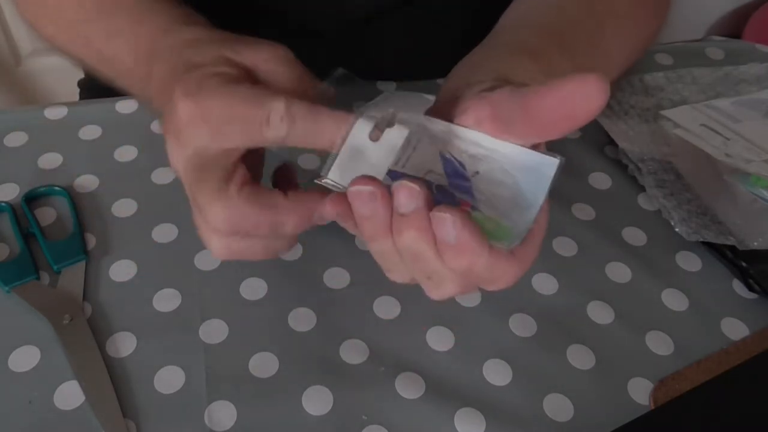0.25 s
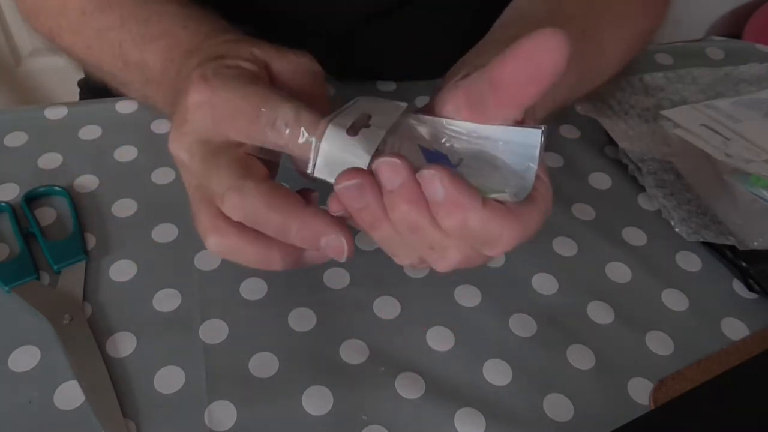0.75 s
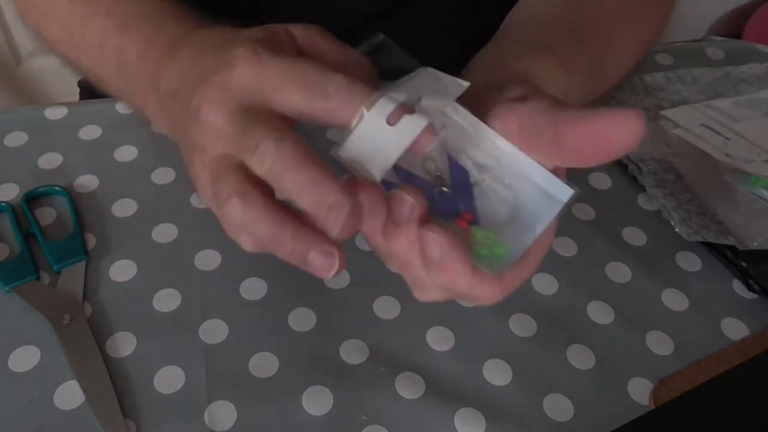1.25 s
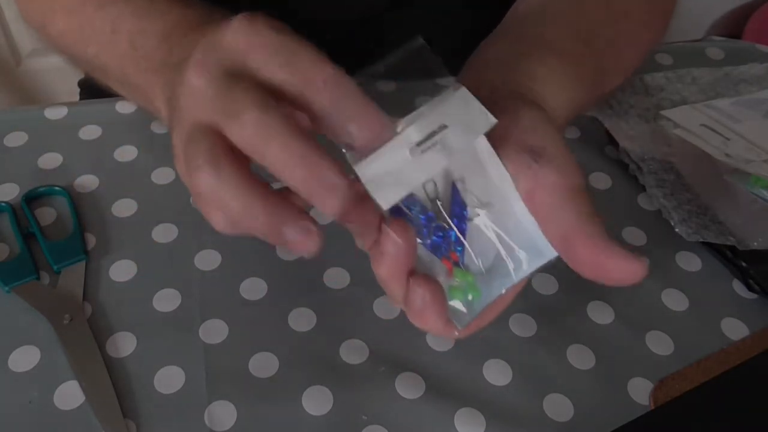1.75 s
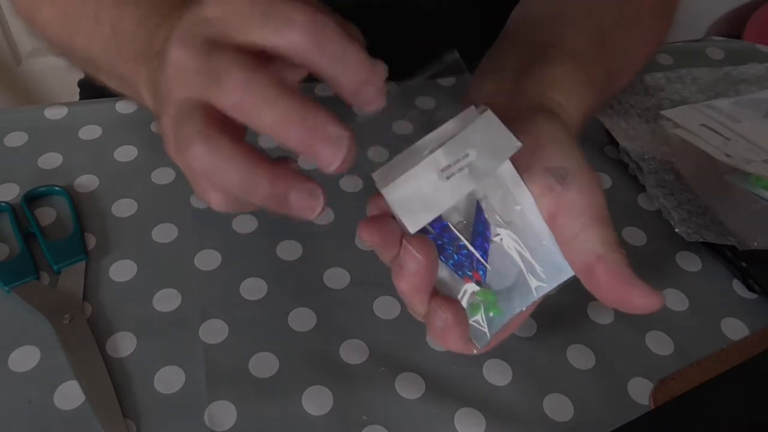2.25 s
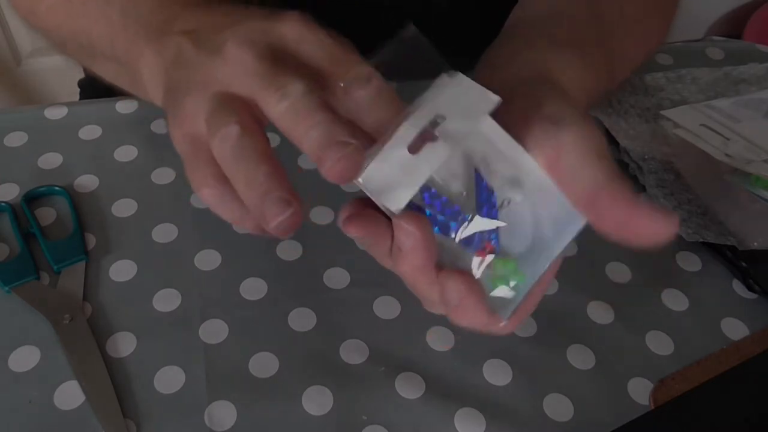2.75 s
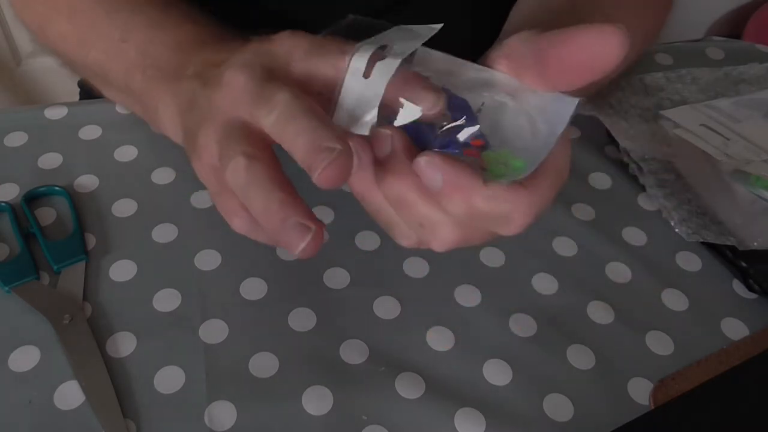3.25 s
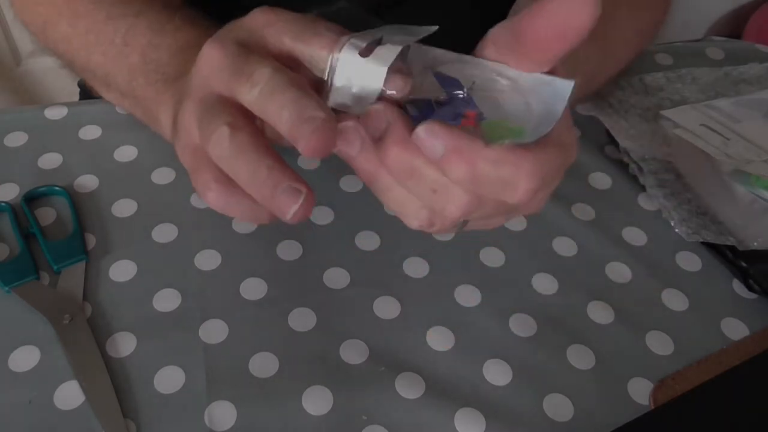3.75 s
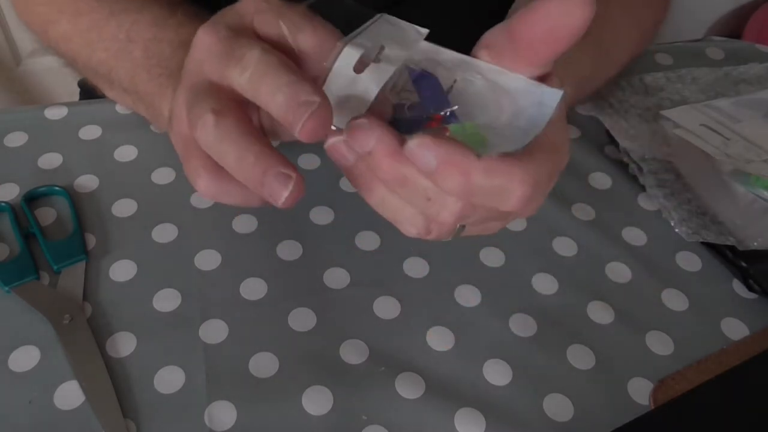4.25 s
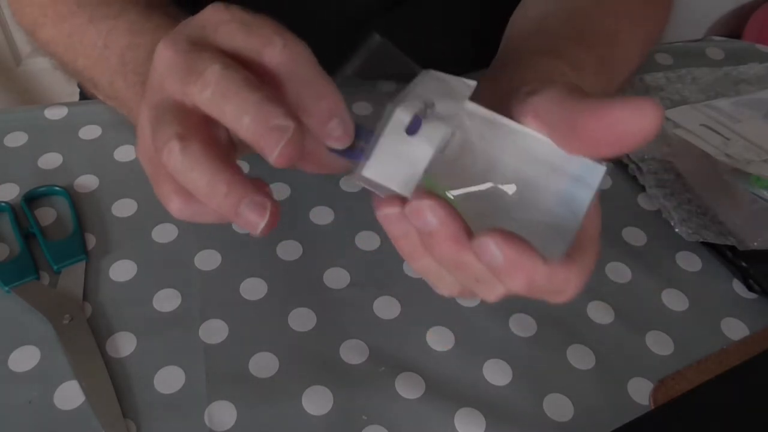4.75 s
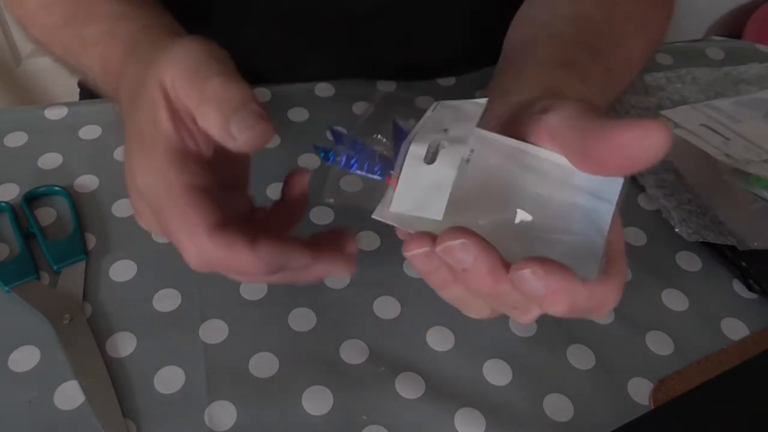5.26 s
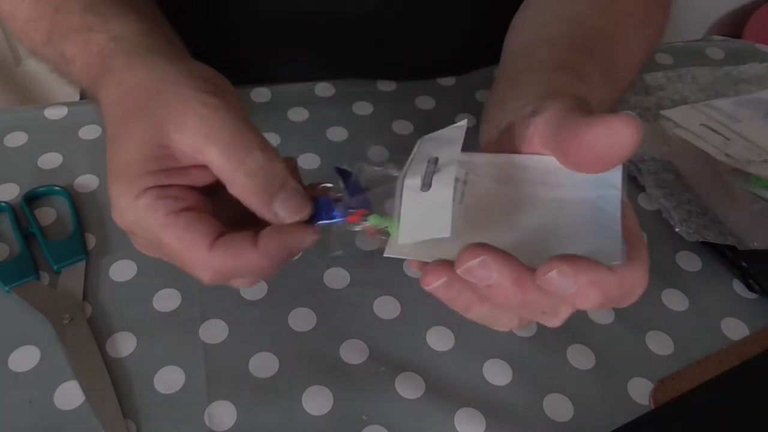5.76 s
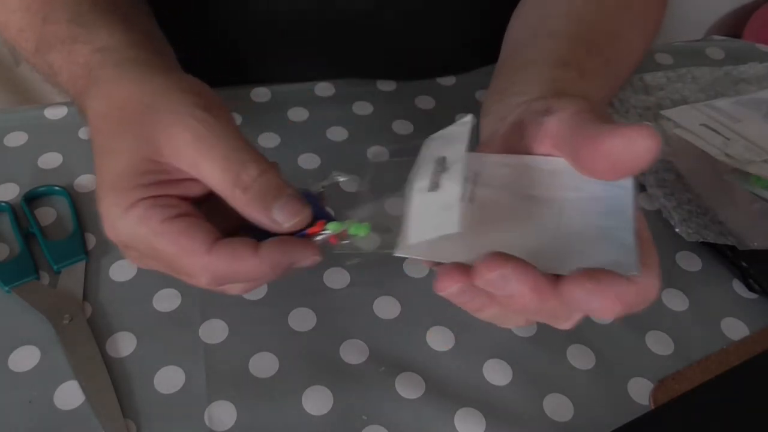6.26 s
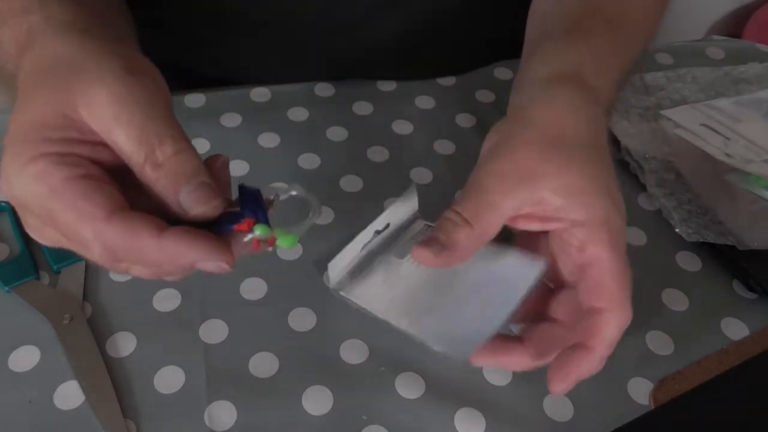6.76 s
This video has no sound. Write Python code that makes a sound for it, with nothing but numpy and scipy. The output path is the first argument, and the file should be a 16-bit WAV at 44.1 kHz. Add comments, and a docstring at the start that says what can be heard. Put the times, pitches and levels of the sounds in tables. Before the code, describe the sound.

Hands open a small, stiff plastic packet in a quiet room. The film crinkles from the start with sharp, irregular cracks, and fingers rub and slide over it with a soft hiss. The crackling eases briefly, comes back densely, then thins out before a last short flurry. It sounds close to the microphone, with a short room echo and a faint low appliance drone underneath.

```python
"""Opening a stiff plastic packet

Hands work a packet open above a table in a quiet room. Creases in the plastic film buckle with
short cracks that make the pouch ring. Fingers rub and glide with a hiss, tiny creases crackle
in between, and a fingertip squeaks once. The room adds a short echo and a low appliance drone."""
import sys
import numpy as np
from scipy import signal
from scipy.fft import rfft, irfft, next_fast_len
from scipy.io import wavfile
from scipy.ndimage import uniform_filter1d

SR = 44100
rng = np.random.default_rng(int(sys.argv[2]) if len(sys.argv) > 2 else 0)


def wrap_up_sound(samples):
    """Save the sound to the file named by the first command line argument, as 16-bit audio."""
    columns = np.atleast_2d(samples).T
    # keep every value between -1 and 1, then stretch to whole-number steps
    tamed = np.clip(columns, -1, 1)
    steps = np.round(tamed * 32767).astype(np.int16)
    wavfile.write(sys.argv[1], SR, steps)


N = 308240
FFT_SIZE = next_fast_len(N + 4096)
HZ = np.fft.rfftfreq(FFT_SIZE, 1 / SR) + 1e-3
STEP_S = .002  # slow loudness changes are worked out this often
OPPOSITE = np.array([[1], [-1]])  # adds to the left side, subtracts from the right

# Levels in the tables are relative. The film sounds in three bands: treble, high and top.
# Creases buckling. Each row: start in seconds, treble snap in dB, high snap in dB,
# pitch of the pouch's ring in Hz, ring level in dB.
CREASE_CRACKS = [(0.051, -37, -17.5, 1520, -33.5), (0.0836, -19, -7.5, 1790, -26),
                 (0.1341, -21.5, -13.5, 2160, -26.5), (0.1475, -34, -27, 2140, -26),
                 (0.157, -25, -19.5, 1160, -30), (0.2139, -14, -17.5, 1750, -18.5),
                 (0.2199, -14.5, -21, 690, -24.5), (0.2694, -25, -27.5, 1930, -40),
                 (0.3012, -28, -20, 1610, -33), (0.3998, -24.5, -20.5, 1370, -35),
                 (0.4034, -34, -38, 1410, -37), (0.4313, -22, -15.5, 2210, -25.5),
                 (0.4464, -12, -12, 1110, -19.5), (0.4912, -29, -32, 1490, -47),
                 (0.5323, -21, -18, 1110, -25.5), (0.5394, -22, -25, 1590, -32),
                 (0.553, -22, -16.5, 2040, -25), (0.5614, -27, -19, 1590, -39),
                 (0.5982, -33, -24, 716, -32), (0.6157, -22, -20, 1510, -34),
                 (0.662, -25, -23.5, 2430, -50), (0.6842, -24, -20, 1120, -28.5),
                 (0.6919, -20, -18, 1740, -28), (0.7356, -26, -31, 1480, -41),
                 (0.773, -38, -30.5, 1500, -28.5), (0.814, -20, -13.5, 1670, -27),
                 (0.845, -24, -31.5, 1810, -37), (0.8643, -25.5, -24, 1600, -42),
                 (0.9306, -34, -28, 825, -31), (0.964, -23.5, -26.5, 1570, -29),
                 (1.036, -32, -18, 1560, -47), (1.0442, -22, -21.5, 1180, -34),
                 (1.0565, -20, -14.5, 1200, -27.5), (1.0921, -35, -14, 880, -25.5),
                 (1.0948, -12, -12.5, 1124, -17.5), (1.1063, -16, -29, 1730, -28),
                 (1.1535, -20.5, -10.5, 1650, -56), (1.2244, -28, -27, 1200, -31.5),
                 (1.3063, -36, -51, 1500, -32), (1.3196, -29, -22, 443, -36),
                 (1.3375, -24, -20.5, 2050, -28.5), (1.3454, -17, -22.5, 1050, -27.5),
                 (1.3539, -24, -20, 1430, -31), (1.3718, -16.5, -16, 1620, -21.5),
                 (1.4562, -30.5, -49, 1610, -43), (1.4957, -22, -18.5, 1460, -31),
                 (1.5116, -16, -21.5, 1620, -24.5), (1.5182, -19.5, -11, 1670, -38),
                 (1.595, -22.5, -23, 2070, -31.5), (1.6348, -24, -23, 2020, -31),
                 (1.7358, -39, -36, 1980, -34), (1.764, -26, -37, 1730, -34),
                 (1.7932, -18.5, -18.5, 1830, -30), (1.8385, -23, -20, 1540, -31),
                 (1.8423, -20.5, -26, 1520, -35), (1.8773, -25.5, -17.5, 1870, -32.5),
                 (1.9344, -30, -34, 2270, -36), (2.012, -24, -26.5, 1740, -26),
                 (2.0194, -18.5, -34, 1770, -37), (2.0928, -43, -54, 1760, -41),
                 (2.295, -27.5, -26.5, 1820, -29), (2.305, -23, -22.5, 1740, -42),
                 (2.322, -30, -29, 870, -39), (2.428, -23.5, -37, 1060, -29.5),
                 (2.5797, -42, -49, 1890, -41), (2.7783, -28, -28, 1770, -40),
                 (2.7959, -23, -20.5, 2500, -27.5), (2.8208, -21, -9, 1520, -32),
                 (2.845, -19, -28, 1850, -28), (2.8696, -21, -19, 2330, -32), (2.9014, -25, -30, 2100, -35),
                 (2.9068, -30, -25, 2170, -37), (2.9281, -39, -22.5, 2250, -39),
                 (2.946, -22, -14, 1970, -28), (2.9699, -29, -17.5, 1520, -38),
                 (3.0009, -28.5, -24, 844, -43), (3.0412, -34, -31, 1970, -52),
                 (3.08, -27.5, -28.5, 1480, -44), (3.1908, -31, -31, 1740, -31.5),
                 (3.281, -20.5, -32, 1870, -33), (3.3405, -27, -24.5, 814, -36.5),
                 (3.3554, -36, -36, 950, -49), (3.3657, -23.5, -22.5, 1500, -27),
                 (3.4183, -27, -25, 2240, -41), (3.4287, -25, -28, 1090, -34),
                 (3.4419, -20, -26, 1410, -30.5), (3.4572, -21, -17, 990, -28.5),
                 (3.4622, -13, -20.5, 2000, -40), (3.4852, -31, -19, 664, -33),
                 (3.4942, -26, -22, 1090, -27), (3.5055, -26, -33, 1520, -38),
                 (3.5218, -22, -15, 1720, -18), (3.5294, -26, -24.5, 1710, -28),
                 (3.5336, -18.5, -22, 1880, -50), (3.5967, -20.5, -22, 565, -33.5),
                 (3.6144, -28, -19, 1720, -32), (3.6426, -22, -21, 1690, -31),
                 (3.6681, -24, -17.5, 1840, -34), (3.6809, -41, -25, 1500, -53),
                 (3.7214, -25.5, -18.5, 1640, -28.5), (3.7554, -27, -18.5, 1520, -31),
                 (3.7893, -28, -27, 1540, -34), (3.8047, -19, -12, 1680, -31),
                 (3.813, -20.5, -23.5, 1540, -25.5), (3.8818, -21.5, -19.5, 1840, -28.5),
                 (3.9311, -27, -22.5, 1310, -51), (3.9625, -25, -34, 1570, -46),
                 (3.981, -12.5, -10.5, 1470, -9.5), (3.9912, -34, -37, 1540, -46),
                 (4.011, -32, -26, 1250, -38), (4.048, -31, -25.5, 1490, -26), (4.086, -30, -29, 1290, -38),
                 (4.1, -29, -29, 1120, -41), (4.1089, -30, -21, 1560, -30), (4.1133, -25, -28, 1420, -41),
                 (4.1173, -18, -21.5, 1230, -32), (4.1382, -28, -29, 1410, -48),
                 (4.1704, -14, -12, 1140, -30.5), (4.1746, -18.5, -15, 1150, -30),
                 (4.2036, -30, -20, 1580, -40), (4.2382, -17.5, -20, 2150, -26),
                 (4.2764, -14.5, -17, 1150, -28), (4.325, -34, -31, 1290, -42),
                 (4.3744, -29, -26, 2200, -29.5), (4.4234, -30, -39, 2230, -47),
                 (4.4341, -24.5, -21, 1590, -23.5), (4.448, -29, -30, 2100, -35),
                 (4.5063, -34.5, -29, 2120, -33), (4.5133, -45, -42, 1410, -36),
                 (4.568, -45, -33, 1650, -36), (4.6002, -21.5, -16, 1900, -26.5),
                 (4.6426, -51, -69, 1390, -37), (4.6959, -32, -30, 2090, -31),
                 (4.7338, -22, -29, 1420, -33.5), (4.767, -32, -28, 820, -37),
                 (4.8015, -30, -23.5, 1060, -39), (4.8458, -25, -24, 1860, -33),
                 (4.8641, -13.5, -14, 1760, -22), (5.0347, -28, -24, 664, -34),
                 (5.0604, -24.5, -26, 1740, -30), (5.0828, -32, -22, 1420, -54),
                 (5.1208, -34, -40, 1520, -42), (5.1559, -35, -27.5, 450, -53),
                 (5.1831, -28, -29.5, 990, -33.5), (5.2261, -21, -27.5, 1380, -52),
                 (5.429, -44.5, -52, 830, -52), (5.635, -30, -29, 1570, -47),
                 (5.9097, -39, -38, 1100, -41.5), (6.025, -41, -41, 2160, -52),
                 (6.14, -31.5, -43, 1060, -37), (6.2222, -23, -21.5, 720, -29),
                 (6.2283, -38, -36, 1810, -33), (6.2443, -36, -27, 1690, -47),
                 (6.2685, -25.5, -19, 1050, -31.5), (6.3758, -48, -30.5, 735, -37),
                 (6.3889, -31, -35, 1500, -36), (6.3949, -50, -22.5, 2440, -55),
                 (6.416, -38, -47, 1080, -29), (6.4208, -31.5, -28.5, 1780, -56),
                 (6.469, -47, -37, 1820, -64), (6.5123, -59, -32.5, 1630, -63),
                 (6.5426, -27, -30.5, 1530, -32.5), (6.5755, -28, -38, 1180, -53),
                 (6.604, -39, -15, 1710, -50), (6.6335, -21, -22, 1880, -43),
                 (6.644, -16, -19, 1520, -29.5), (6.656, -46, -49, 1960, -56), (6.736, -34, -36, 1410, -50),
                 (6.7592, -28, -16, 1210, -38), (6.7629, -23.5, -20, 1810, -42),
                 (6.854, -36, -35, 1480, -44)]
# Hands working the packet. Each row: time in seconds, then the film's treble rustle
# and the pouch's rustle in dB.
HAND_RUSTLE = [(0, -37.5, -39), (.12, -38.5, -56), (.37, -47.5, -48), (.55, -39, -42), (.7, -40.5, -39),
               (.78, -51, -49), (1.01, -43, -40), (1.08, -36, -35), (1.28, -49.5, -53), (1.46, -43, -42),
               (1.71, -48, -51.5), (1.96, -50, -41), (2.11, -61, -50.5), (2.45, -65, -60), (2.6, -59, -62),
               (2.73, -58.5, -50), (2.77, -39.5, -33.5), (2.97, -39.5, -45.5), (3.19, -48, -52),
               (3.33, -50, -47), (3.51, -42, -39.5), (3.7, -43.5, -45.5), (4.19, -41.5, -41),
               (4.34, -45, -46), (4.87, -46.5, -42.5), (5.15, -74, -56), (5.55, -67, -68),
               (5.95, -56, -54.5), (6.15, -59.5, -55.5), (6.24, -43, -42.5), (6.5, -56, -53),
               (6.65, -47.5, -62), (6.8, -52, -47), (6.92, -57, -65), (6.99, -49.5, -49)]
# Fingers gliding over smooth film. Each row: loudest moment, rise time and fall time in seconds,
# then treble, high and pouch levels in dB.
FINGER_GLIDES = [(.21, 0.012, 0.015, -32, -44, -22.5), (.88, 0.02, 0.034, -29.5, -35, -35),
                 (1.86, 0.04, 0.11, -57, -59, -42.5), (2.01, 0.021, 0.01, -40, -38, -24),
                 (2.17, 0.027, 0.11, -48, -41, -38.5), (2.31, 0.078, 0.027, -42, -36, -38),
                 (2.6, 0.039, 0.023, -55, -65, -49), (2.71, 0.028, .04, -56, -59, -45),
                 (4.02, 0.016, 0.14, -61, -60, -35), (4.71, 0.02, 0.039, -35, -33, -32.5),
                 (4.94, 0.074, .05, -44, -58, -42), (5.04, 0.071, 0.022, -42, -40, -37.5),
                 (5.32, .06, 0.11, -52.5, -71, -52), (5.62, 0.018, 0.046, -54, -52, -65),
                 (5.78, 0.049, 0.035, -42, -42, -38.5), (6.31, 0.025, .04, -53, -50, -52),
                 (6.58, 0.039, 0.016, -44, -60.5, -47.5), (6.96, .02, .05, -55, -57, -54)]
# Tone of the three film bands, the pouch and the room's hiss. Each row: frequency in Hz, level in dB.
TREBLE_TONE = [(1800, -32), (2700, -4.5), (4200, 7), (5600, 5.5), (6600, -0.5), (9000, -15)]
HIGH_TONE = [(4500, -24), (6500, -4), (8400, 0), (9800, -3), (11500, -12), (14000, -24)]
TOP_TONE = [(7500, -11), (10000, -4), (11500, 4), (14000, -0.5), (15600, -5), (17500, -31)]
POUCH_TONE = [(200, -1.5), (400, 8.5), (700, 5.5), (1080, 8), (1300, 6), (1600, 11), (2100, 8), (2700, 0),
              (4000, -25)]
HISS_TONE = [(180, -15.5), (300, -11.5), (550, -16), (950, -12.5), (2000, -22.5), (3100, -32.5),
             (4200, -27), (8500, -43), (13000, -33), (16000, -41)]
# Resonances of the droning room and of a card inside the pouch.
# Each row: frequency in Hz, width in Hz, level in dB.
DRONE_RESONANCES = [(45, 39, -16), (96.9, 11, -12.5), (132.8, 14, -3.5), (166.3, 14, -5), (201.3, 44.5, -8),
                    (395, 173, -20)]
CARD_RESONANCES = [(1480, 540, 9.5), (600, 360, 8)]
# How the two microphone openings differ. Each row: frequency in Hz, left minus right level in dB,
# how far the right side's wave leads in radians.
MIC_OPENINGS = [(60, -1, -.2), (300, -2.6, -.3), (800, -3.3, -.35), (1550, -1.7, -.26), (2900, .3, 0),
                (6000, .6, .1), (9100, -2.2, .4), (10100, -6, 0), (11700, -1, -.62), (13900, 4, -.2),
                (16000, 3.2, 0)]


def undb(db):
    """Turn decibels into a multiplier."""
    return 10 ** (np.asarray(db) / 20)


def power_db(power):
    """Turn power into decibels."""
    return 10 * np.log10(power + 1e-12)


def set_level(x, db):
    """Scale a sound to an average level in dB."""
    return x * undb(db) / np.sqrt(np.mean(x ** 2))


def decay(t, fade_s):
    """Die away by 60 dB every fade_s seconds."""
    return undb(-60 * t / fade_s)


def resonate(x, resonances, order=1):
    """Pass a sound through several resonances side by side."""
    gain = sum(undb(db) / (1 + 1j * (HZ - hz * hz / HZ) / width) ** order
               for hz, width, db in resonances)
    return irfft(rfft(x, FFT_SIZE) * gain)[..., :N]


def colour(x, tone):
    """Apply a tone curve, scaled so that white noise keeps its power."""
    hz, db = np.transpose(tone)
    gain = undb(np.interp(np.log(HZ), np.log(hz), db))
    return irfft(rfft(x, FFT_SIZE) * gain / np.sqrt(np.mean(gain ** 2)), FFT_SIZE)[..., :N]


def wander(per_second):
    """A smooth random wobble with a typical size of 1."""
    hold = int(SR / per_second)
    steps = np.repeat(rng.standard_normal(N // hold + 1), hold)
    wobble = uniform_filter1d(uniform_filter1d(steps, hold), hold)[:N]
    return wobble / wobble.std()


def per_sample(curves):
    """Fill in slow curves so that every sample has a value."""
    return [np.interp(np.arange(N) / SR, np.arange(len(c)) * STEP_S, c) for c in curves]


def place(start_s, db, bursts, pan_db):
    """Add each short burst at its start time, leaning left or right."""
    at = np.clip((start_s * SR).astype(int), 0, N - 1)[:, None] + np.arange(bursts.shape[-1])
    sides = bursts * undb(db + np.array([pan_db, -pan_db]) / 2)[:, :, None]
    return np.array([np.bincount(at.ravel(), side.ravel(), N)[:N] for side in sides])


def appliance_drone():
    """An appliance drones through the room's resonances, with a wavering mains hum and a faint hiss."""
    rumble, rumble_spread, air, air_spread = rng.standard_normal((4, N))
    drone = resonate(rumble + .42 * rumble_spread * OPPOSITE, DRONE_RESONANCES, order=2)
    hum = undb(2.5 * wander(10)) * np.sin(2 * np.pi * 100 * np.arange(N) / SR + .9 * wander(11))
    hiss = colour(air + .58 * air_spread * OPPOSITE, HISS_TONE)
    return set_level(drone, -53.5) + set_level(hum, -56.5) + set_level(hiss, -57)


def rustle_levels():
    """Handled film rustles, building just before each crack and settling after it. Gives dB curves."""
    t = np.arange(0, N / SR, STEP_S)
    hand_s, hand_treble, hand_pouch = np.transpose(HAND_RUSTLE)
    crack_s, crack_treble, crack_high, _, crack_ring = np.transpose(CREASE_CRACKS)
    since_crack = t[:, None] - crack_s
    build_s, settle_s = .03, .22
    swell = decay(np.abs(since_crack), np.where(since_crack > 0, settle_s, build_s)) ** 2
    levels = []
    for hand_db, crack_db, offset_db in ((hand_treble, crack_treble, -25),
                                         (hand_treble - 2, crack_high, -29),
                                         (hand_pouch, crack_ring, -20)):
        handling = undb(np.interp(t, hand_s, hand_db)) ** 2
        settling = swell @ undb(.67 * crack_db + offset_db) ** 2  # bigger cracks stir up more
        levels.append(power_db(handling + settling))
    crease_db = 2.5 - .03 * (levels[0] + 43)  # how far tiny creases stand out from the rubbing
    return per_sample(levels + [crease_db])


def finger_rub(treble_db, high_db, pouch_db, crease_db):
    """Fingers rub the film with a hiss, airier where they crease it less. Nothing rings."""
    grip_db = 1.5 * wander(50)
    top_db = high_db - 36 - 3.2 * crease_db
    bands = []
    for db in (treble_db - 9, high_db - 10.5, top_db, pouch_db - 9):
        hiss = rng.standard_normal(N) + .074 * rng.standard_normal(N) * OPPOSITE
        bands.append(hiss * undb(db + grip_db + .87 * wander(25.31)))
    no_ring = np.zeros((2, N))
    return np.array(bands + [no_ring])


def tiny_creases(treble_db, high_db, pouch_db, crease_db, count=900):
    """Tiny creases buckle at random, each with its own tone and as loud as the rustle allows."""
    when, size, *tints, pitch = rng.random((count, 6)).T
    at = (when * N).astype(int)
    size_db = crease_db[at] + .5 - 1.02 * np.log(size + .12)
    treble, high, ring = [db[at] + size_db + 8 * (tint - .5)
                          for db, tint in zip((treble_db, high_db, pouch_db), tints)]
    return crease_cracks(at / SR, treble, high, ring_hz=700 + 1500 * pitch, ring_db=ring - 4.5)


def crease_cracks(start_s, treble_db, high_db, ring_hz, ring_db, samples=560):
    """A crease snaps for about a millisecond, the film shivers on, and the jolt rings the pouch."""
    t = np.arange(samples) / SR
    lean, brightness, detune, direction, damping, length = rng.standard_normal((len(start_s), 6)).T
    noise = np.sign(rng.random((len(start_s), 5, samples)) - .5)
    pan_db = .5 * lean
    stretch = np.exp(.12 * length[:, None])  # long creases snap for longer
    kink = undb(8) * decay(t, fade_s=.001)  # the sharp first instant
    snap = kink + decay(np.maximum(t - .0009 * stretch, 0), fade_s=.005 * stretch)
    shiver = undb(-10.5) * decay(t, fade_s=.05) * (1 - t / t[-1])
    crack = snap + shiver
    # each side hears a slightly different part of the crease
    spread = noise[:, 4] * OPPOSITE[:, :, None]
    treble = place(start_s, treble_db - 9.5, crack * (noise[:, 0] + .051 * spread), pan_db)
    high = place(start_s, high_db - 10, crack * (noise[:, 1] + .19 * spread), pan_db)
    # the fastest vibrations die with the snap
    top = place(start_s, high_db - 13 + 2 * brightness, snap * (noise[:, 2] + .18 * spread), pan_db)
    pouch = place(start_s, ring_db - 7.5, crack * (noise[:, 3] + .029 * spread), pan_db)
    fade = decay(t * np.exp(.15 * damping[:, None]), fade_s=.0105)
    phase = 2 * np.pi * ring_hz[:, None] * t
    # a second, shorter tone at a different pitch roughens the ring
    tones = np.sin(phase) + .5 * fade * np.sin(phase * np.exp(.417 * detune[:, None]))
    attack = np.minimum(t / .00092, 1)
    ring = attack * fade * tones * np.sign(direction[:, None])
    return np.array([treble, high, top, pouch, place(start_s, ring_db + 6, ring, .76 * pan_db)])


def finger_glides():
    """A finger glides over smooth film, and its hiss swells and dies away."""
    peak_s, rise_s, fall_s, *band_dbs = np.transpose(FINGER_GLIDES)
    since_peak = np.arange(0, N / SR, STEP_S)[:, None] - peak_s
    swell = np.exp(-(since_peak / np.where(since_peak < 0, rise_s, fall_s)) ** 2)
    levels = [power_db(swell @ undb(db) ** 2) for db in band_dbs]
    return finger_rub(*per_sample(levels), crease_db=-7)


def fingertip_squeak(peak_s=5.955, half_length_s=.02, hz=2920):
    """A fingertip squeaks faintly on the film: one short, pure tone."""
    t = np.arange(N) / SR
    swell = np.exp(-((t - peak_s) / half_length_s) ** 2)
    return undb(-61) * swell * np.sin(2 * np.pi * hz * t)


def add_room_echo(x, echo_db=-15):
    """The table and walls answer after 4 milliseconds with an echo that dulls as it fades."""
    t = np.arange(SR // 2) / SR
    shared, left, right = rng.standard_normal((3, len(t)))
    noise = shared + .83 * np.array([left, right])
    dull = signal.sosfilt(signal.butter(2, 3000, fs=SR, output="sos"), noise)
    echo = dull * decay(t, fade_s=.31) + (noise - dull) * decay(t, fade_s=.23)
    echo *= np.clip((t - .004) / .0015, 0, 1)
    echo *= undb(echo_db) / np.sqrt(np.sum(echo ** 2) / 2)
    return x + signal.fftconvolve(x.mean(axis=0)[None], echo, axes=1)[:, :N]


def scene():
    """Mix the film, the pouch, the card inside it and the squeak in the droning room."""
    rustle = rustle_levels()
    glide_treble, glide_high, glide_top, glide_card, _ = finger_glides()
    cracks = crease_cracks(*np.transpose(CREASE_CRACKS))
    treble, high, top, pouch, ring = cracks + tiny_creases(*rustle) + finger_rub(*rustle)
    film = (colour(treble + glide_treble, TREBLE_TONE)
            + colour(high + glide_high, HIGH_TONE)
            + colour(top + glide_top, TOP_TONE))
    card = resonate(glide_card, CARD_RESONANCES)
    packet = film + colour(pouch, POUCH_TONE) + card + ring + fingertip_squeak()
    return add_room_echo(packet) + appliance_drone()


def record(dry):
    """Two microphone openings hear slightly differently; bass and top are cut and peaks rounded."""
    hz, balance_db, lead_rad = np.transpose(MIC_OPENINGS)
    balance = np.interp(np.log(HZ), np.log(hz), balance_db)
    lead = np.interp(np.log(HZ), np.log(hz), lead_rad)
    left = undb(balance / 2) * np.exp(-.5j * lead)
    sound = irfft(rfft(dry, FFT_SIZE) * np.array([left, 1 / left]), FFT_SIZE)[:, :N]
    low_cut_hz, high_cut_hz = 110, 15950
    sound = signal.sosfilt(signal.butter(1, low_cut_hz, "high", fs=SR, output="sos"), sound)
    sound = .9 * np.tanh(sound / .9)
    return signal.sosfilt(signal.ellip(10, .2, 70, high_cut_hz, fs=SR, output="sos"), sound)


dry = scene()
out = record(dry)
wrap_up_sound(out)
```